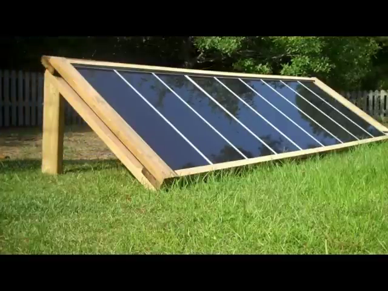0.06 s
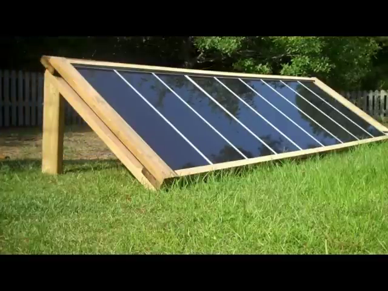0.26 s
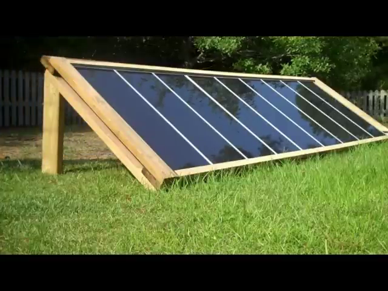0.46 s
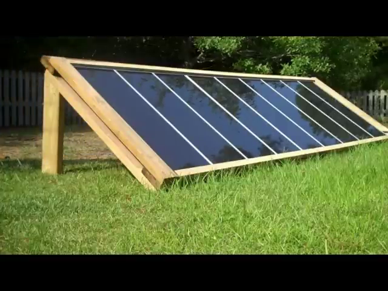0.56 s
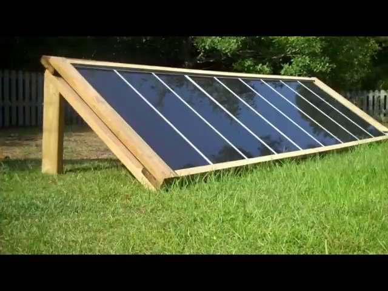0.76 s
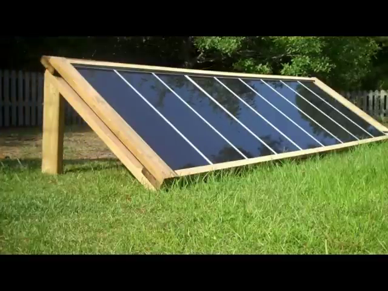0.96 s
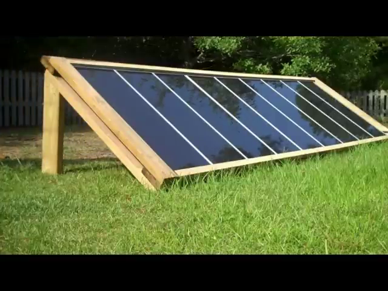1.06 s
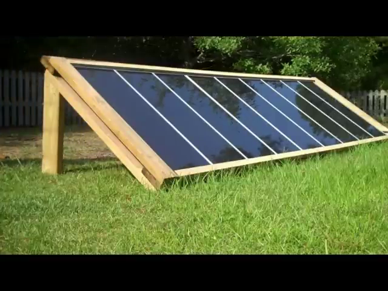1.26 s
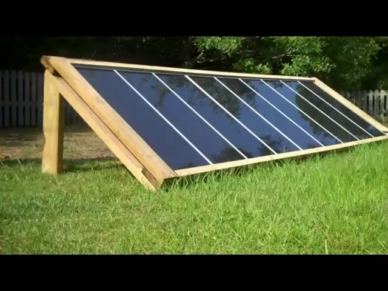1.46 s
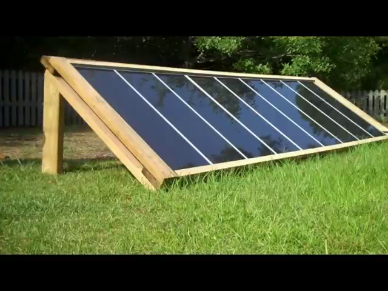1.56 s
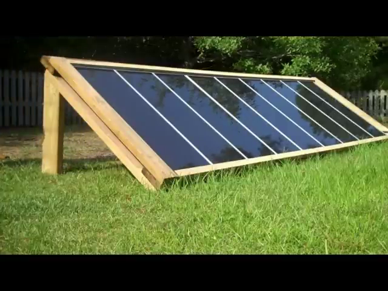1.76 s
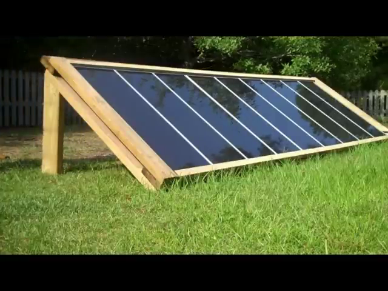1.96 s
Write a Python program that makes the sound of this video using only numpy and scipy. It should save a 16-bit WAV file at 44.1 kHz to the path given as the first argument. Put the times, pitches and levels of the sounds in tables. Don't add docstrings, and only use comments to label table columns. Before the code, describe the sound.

A hard catch on a hollow panel is worked twice, each time a brief finger rub, rattling knocks and a bright crack, very close to a small stereo microphone in a quiet garden with steady hiss.

```python
import sys
import numpy as np
from scipy import signal
from scipy.fft import rfft, irfft, next_fast_len
from scipy.io import wavfile
from scipy.ndimage import uniform_filter1d, map_coordinates

SR = 44100
rng = np.random.default_rng(int(sys.argv[2]) if len(sys.argv) > 2 else 0)


def ratio(d):
    e = np.asarray(d, float) / 20
    return 10 ** e


def unload_audio(sound):
    columns = np.transpose(np.atleast_2d(sound))
    steps = np.round(np.clip(columns, -1, 1) * 32767)
    wavfile.write(sys.argv[1], SR, steps.astype(np.int16))


N = 88200
TIME = np.arange(N) / SR
LEFT_RIGHT = np.array([[1], [-1]])


def unit(x):
    return x / np.sqrt(np.mean(x ** 2) + 1e-20)


def along(points, hz):
    f, value = np.transpose(points)
    return np.interp(np.log(hz + 1), np.log(f + 1), value)


def filtered(x, response):
    m = next_fast_len(x.shape[-1] + 4096)
    spectrum = rfft(x, m) * response(np.fft.rfftfreq(m, 1 / SR))
    return irfft(spectrum, m)[..., :x.shape[-1]]


def wobble(rate, size=N):
    knots = rng.standard_normal(size // 8)
    return map_coordinates(knots, [np.arange(size) * rate / SR])


def patchy(depth_db):
    z = signal.stft(rng.standard_normal((2, N)), nperseg=512)[2]
    field = rng.standard_normal(z.shape[1:])
    field = uniform_filter1d(uniform_filter1d(field, 6, 0), 8, 1)
    return signal.istft(z * ratio(depth_db * unit(field)), nperseg=512)[1][:, :N]


def grit(spectrum, depth_db, shape):
    shared = 0.89
    common = rng.standard_normal(len(shape))
    own = rng.standard_normal((2, len(shape)))
    pair = np.sqrt(shared) * common + np.sqrt(1 - shared) * own
    pair = pair * ratio(depth_db * wobble(1500, size=len(shape)))
    coloured = filtered(pair * shape, lambda f: ratio(along(spectrum, f)))
    return unit(coloured) * np.sqrt(np.mean(shape ** 2))


def ringing(modes, weights_db, lasting):
    t = np.arange(SR // 10) / SR
    out = np.zeros(len(t))
    for k, ((hz, db, t60), weight_db) in enumerate(zip(modes, weights_db)):
        decay = ratio(db + weight_db - 60 * t / (t60 * lasting))
        out += (-1) ** k * decay * np.sin(2 * np.pi * hz * t)
    return out


# f/Hz, level/dB per Hz
GARDEN_COLOUR = [(30, -14), (125, 4), (420, -4), (850, 2.5), (2200, -9), (7000, -12.5), (14000, -23.5),
                 (14600, -60)]
# f/Hz, likeness/1
PORT_LIKENESS = [(30, .5), (80, 1), (200, 0.98), (700, 1), (1300, 0.72), (2400, 0.12), (5000, 0.66),
                 (15000, 0.22)]


def garden():
    level_db, patch_db = -50.5, 2

    def mid_side(f):
        angle = np.arccos(np.clip(along(PORT_LIKENESS, f), -1, 1)) / 2
        return ratio(along(GARDEN_COLOUR, f)) * np.array([np.cos(angle), np.sin(angle)])

    mid, side = filtered(patchy(patch_db), mid_side)
    return ratio(level_db) * unit(np.array([mid + side, mid - side]))


# f/Hz, level/dB
WHINES = [(6275, -75), (6395, -76), (6687, -75)]


def insects():
    width_hz = 11.5
    lines = lambda f: sum(ratio(db) / (1 + ((f - hz) / width_hz) ** 2) for hz, db in WHINES)
    total = np.linalg.norm(ratio([db for hz, db in WHINES]))
    return unit(filtered(rng.standard_normal(N), lines)) * total


# t/s, level/dB
RUB_LEVEL = [(.12, -79), (.2, -56), (.25, -45), (.33, -49), (.45, -57), (.55, -91), (.7, -80), (.78, -54.5),
             (.83, -43), (.9, -49.5), (1.0, -62.5), (1.1, -78)]
# f/Hz, level/dB
SKIN_COLOUR = [(1500, -14), (4000, -3.5), (6000, -3.5), (9000, 1), (11000, 0), (14000, -2), (14800, -50)]
# f/Hz, level/dB
DULL_COLOUR = [(350, -53), (800, -3.5), (1500, -8.5), (3000, -1.5), (4500, -8), (7000, -21), (16000, -57)]


def rubbing():
    dull_db, grit_db = -1.5, 3
    s, db = np.transpose(RUB_LEVEL)
    jerks_db = 3.3 * wobble(59.3) + 2.04 * wobble(250)
    level = ratio(np.interp(TIME, s, db) + jerks_db)
    return grit(SKIN_COLOUR, grit_db, level) + ratio(dull_db) * grit(DULL_COLOUR, grit_db, level)


# t/s, peak level/dB, strongest pitch f/Hz, contact/s
BODY_KNOCKS = [(0.1437, -28, 796, .002), (.149, -30.5, 1380, 0.0023), (.188, -25, 975, 0.0049),
               (0.3992, -35.5, 6200, .004), (0.235, -23, 1520, .004), (.2442, -14, 2040, 0.004),
               (.247, -11, 1480, .003), (.246, -19.5, 554, 0.0027), (0.2607, -23, 1430, 0.01),
               (.299, -19.5, 2330, 0.006), (.281, -23.5, 2060, 0.009), (0.2886, -20.5, 1120, 0.0036),
               (.2955, -10, 1660, 0.0069), (.297, -5.5, 1225, 0.0088), (.321, -32, 1220, .003),
               (.7255, -24, 960, 0.0041), (.302, -23, 710, 0.007), (.7935, -17, 1520, 0.0099),
               (0.801, -21, 980, 0.0062), (0.816, -30, 1140, 0.0056), (.827, -22, 1390, 0.0072),
               (0.8444, -12, 1510, 0.0054), (.848, -14, 953, 0.005), (.880, -29, 1200, 0.0064),
               (1.5172, -33, 1210, 0.003), (1.516, -37.5, 3300, 0.0033), (1.698, -36, 1140, 0.0046),
               (1.698, -38, 2310, 0.0017), (1.6974, -39, 5150, .005), (1.982, -36, 1870, 0.0027)]
# f/Hz, level/dB, t60/s
BODY_MODES = [(533, -6, 0.044), (714, 14, 0.029), (980, -0.5, .032), (1225, 11, 0.019), (1520, -0.5, 0.031),
              (1724, -4, 0.034), (2080, -1, 0.018), (2330, -8, 0.071), (3260, 16, 0.043), (3500, -5, 0.032),
              (5150, 1, 0.022), (6200, 0, 0.024)]


def knocks():
    level_db, rough_db = -5, -25
    reach_oct = 0.15
    usual_s, rise_s = 0.0068, 0.0019
    low_cut_hz, lead_s = 450, 0.00004
    out = np.zeros(N + SR)
    t = np.arange(SR // 50) / SR
    for s, db, hz, contact in BODY_KNOCKS:
        near_db = [-3 * (np.log2(mode[0] / hz) / reach_oct) ** 2 for mode in BODY_MODES]
        scrape = ratio(rough_db) * rng.standard_normal(len(t)) * ratio(-30 * t / contact)
        push = (t == 0) + scrape
        hit = np.convolve(push, ringing(BODY_MODES, near_db, contact / usual_s))
        hit = hit * np.clip(np.arange(len(hit)) / SR / rise_s, 0, 1)
        out[round(s * SR):][:len(hit)] += ratio(db + level_db) * hit / np.abs(hit).max()
    body = filtered(out[:N], lambda f: (1j * f / (low_cut_hz + 1j * f)) ** 3)
    return filtered(body, lambda f: np.exp(1j * np.pi * f * lead_s * LEFT_RIGHT))


def burst(length):
    lead, rise_s, hold = 64, 0.00051, 0.14
    t = (np.arange(SR // 10) - lead) / SR
    fall_db = -30 * np.clip(t - hold * length, 0, None) / length
    return np.clip(t / rise_s, 0, 1) * ratio(fall_db)


# t/s, peak level/dB, length/s, left-right/dB, dull part/dB
FIRST_STROKE = [(0.172, -37, 0.0035, -1, 8), (0.186, -33, 0.009, -4, -5), (0.2015, -32, 0.0051, 0, -6),
                (0.223, -12.5, 0.012, -0.5, -19), (0.228, -28, 0.025, 2, 6.5),
                (0.2439, -14.5, 0.012, 4, 3.5), (0.271, -31, 0.0091, -8, 8.5), (0.281, -6, 0.0045, -2, -11),
                (.289, -15, 0.0086, -10, -14), (0.2945, -2, 0.0086, 13, -7),
                (0.2965, -1.5, 0.012, -5.5, -1), (0.3002, -11, 0.006, -2, -1.5),
                (0.318, -26, 0.032, 10.5, 0), (0.36, -21.5, 0.011, 6, -7.5), (0.403, -27, 0.0043, -6, -30),
                (.4324, -33, .006, 8, -9)]
# t/s, peak level/dB, length/s, left-right/dB, dull part/dB
SECOND_STROKE = [(.745, -36, 0.016, 5, 6), (.7875, -23, 0.0025, 8, 1), (0.7955, 4, 0.0015, 7, -9),
                 (0.7976, -8.5, 0.0094, 0, -10), (0.8163, -14, 0.0065, -3, 0), (.820, -20.5, 0.012, -7, -6),
                 (0.836, -28, 0.0087, -2, 3), (0.839, -18, 0.0029, 6, 3), (0.842, -17, .003, 2, 3),
                 (0.8441, -0.5, 0.0068, 1.5, -14.5), (0.8463, -2, 0.008, -2, -13),
                 (.8688, -23, 0.0032, 15, -21), (.880, -27, 0.026, 8, -11), (.9085, -15.5, 0.0036, 6, -31),
                 (0.947, -28.5, 0.011, -9, -21), (0.9742, -30, 0.0048, 8, -16), (1.517, -34, 0.0055, -3, 2),
                 (1.6975, -35, .004, -6, 8.5)]
# f/Hz, level/dB
BRIGHT_COLOUR = [(1500, -9.5), (4000, -8), (6000, -5), (9000, 6), (11000, 0.5), (14000, 9), (15600, -29),
                 (16300, -50)]
# f/Hz, level/dB, t60/s
CATCH_MODES = [(5130, 7.5, 0.054), (5780, -3, 0.072), (6180, 16, 0.013), (8180, -6, 0.022),
               (8380, 6.5, .02), (8580, 3, 0.016)]


def cracks():
    level_db, ring_db, grit_db = -13.5, -11.5, 1
    lead = 64
    snap, dull = np.zeros((2, N + SR)), np.zeros((2, N + SR))
    for s, db, length, pan_db, dull_db in FIRST_STROKE + SECOND_STROKE:
        shape = ratio(db + level_db) * burst(length)
        start = round(s * SR) - lead
        span = slice(start, start + len(shape))
        snap[:, span] += grit(BRIGHT_COLOUR, grit_db, shape) * ratio(pan_db / 2 * LEFT_RIGHT)
        dull[:, span] += grit(DULL_COLOUR, grit_db, shape) * ratio(dull_db)
    tap = ringing(CATCH_MODES, np.zeros(len(CATCH_MODES)), 0.59)
    ring = signal.fftconvolve(snap, tap[None] / np.linalg.norm(tap), axes=1)
    return snap[:, :N] + ratio(ring_db) * ring[:, :N] + dull[:, :N]


# t/s, level/dB
HOUSING_JOLTS = [
    (.247, -66),
    (0.2948, -19),
    (.797, -63),
    (0.848, -34),
]


def jolts():
    length_s, right = 0.00059, -0.15
    pulse = np.zeros(N)
    for s, db in HOUSING_JOLTS:
        u = np.clip(TIME - s, 0, None) / length_s
        pulse += ratio(db) * u ** 2 * np.exp(-u)
    return pulse * np.array([[1], [right]])


def scene():
    return garden() + insects() + rubbing() + knocks() + cracks() + jolts()


# whistle f/Hz, sharpness/1, steepness/1, level/dB, roll-off f/Hz
MIC_PORTS = [(8110, 7.9, 0.83, 1, 19400), (6340, 3.22, 1.827, 0.8, 7870)]


def microphones(f):
    low_cut_hz, left_lag_s = 25, 0.00012
    ports = []
    for hz, sharpness, steepness, db, top_hz in MIC_PORTS:
        whistle = 1 / (1 - (f / hz) ** 2 + 1j * f / (hz * sharpness)) ** steepness
        ports.append(ratio(db) * whistle / (1 + 1j * f / top_hz) ** 2)
    lag = np.exp(-1j * np.pi * f * left_lag_s * LEFT_RIGHT)
    return np.array(ports) * lag * 1j * f / (low_cut_hz + 1j * f)


def low_pass(x):
    return signal.sosfilt(signal.butter(12, 15890, fs=SR, output="sos"), x)


def record(dry):
    hiss_db, hiss_patch_db, hiss_top_hz, hiss_knee_hz = -51, 2, 14400, 8950
    clip_top, clip_hard = 1.0, 8
    hiss = filtered(patchy(hiss_patch_db), lambda f: (f < hiss_top_hz) / (1 + (f / hiss_knee_hz) ** 4))
    mix = filtered(dry, microphones) + ratio(hiss_db) * hiss
    mix = mix / (1 + np.abs(mix / clip_top) ** clip_hard) ** (1 / clip_hard)
    return low_pass(mix)


dry = scene()
out = record(dry)
unload_audio(out)
```